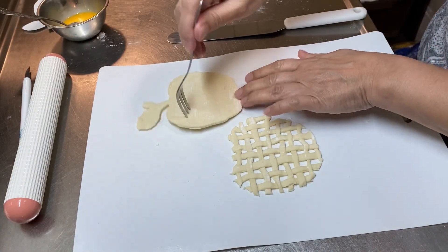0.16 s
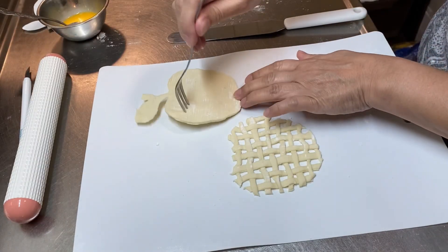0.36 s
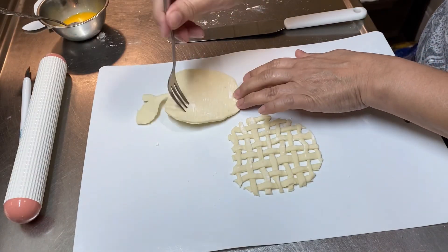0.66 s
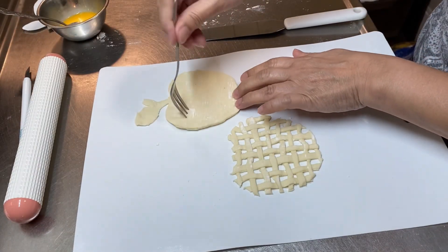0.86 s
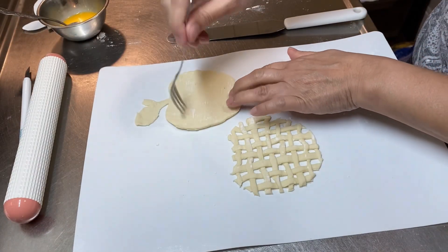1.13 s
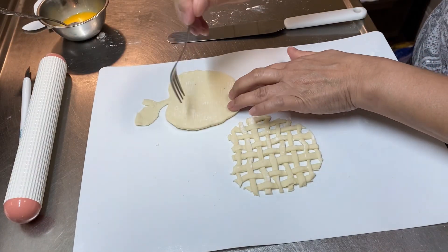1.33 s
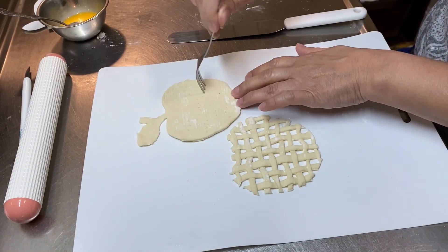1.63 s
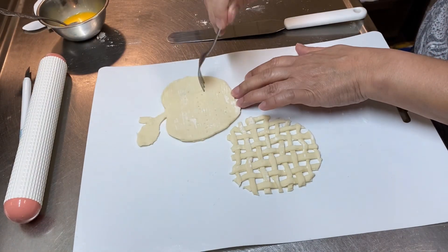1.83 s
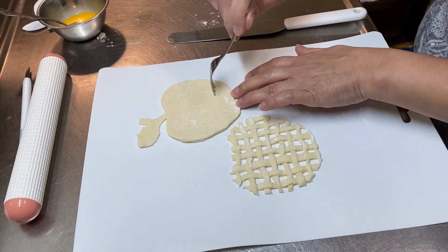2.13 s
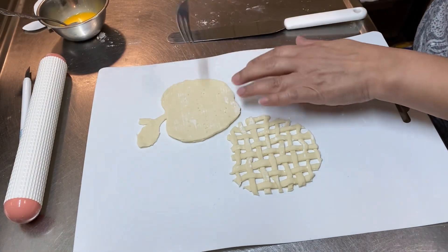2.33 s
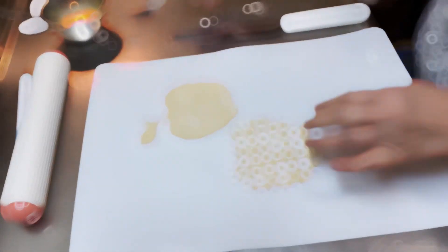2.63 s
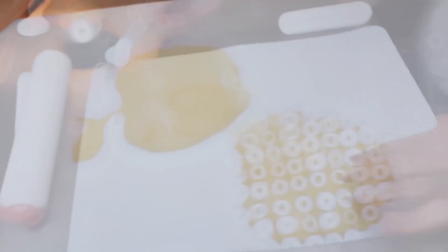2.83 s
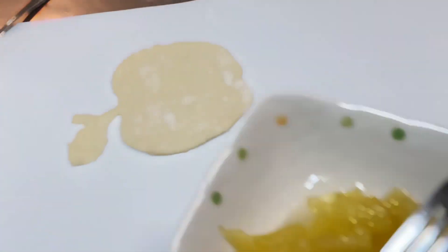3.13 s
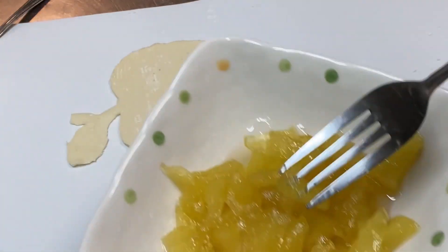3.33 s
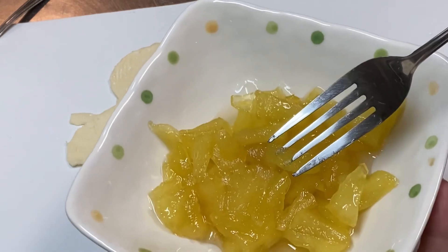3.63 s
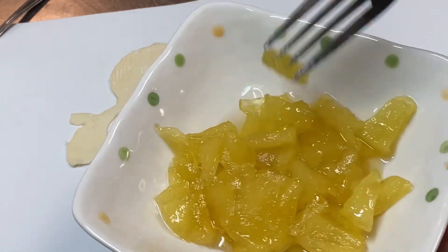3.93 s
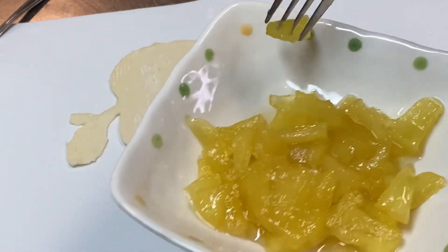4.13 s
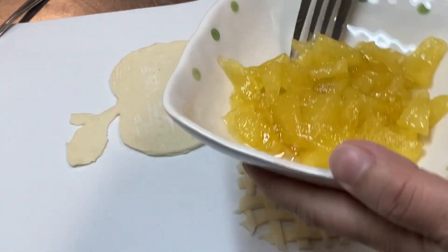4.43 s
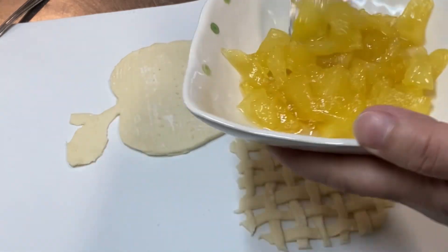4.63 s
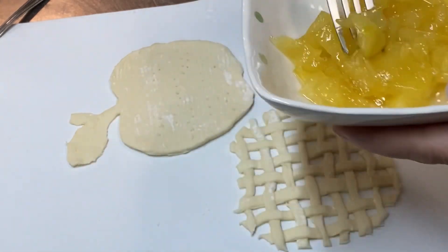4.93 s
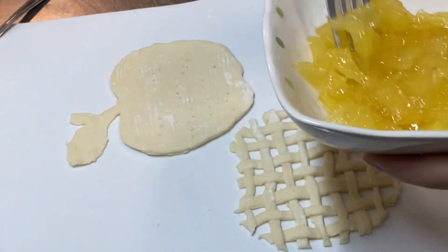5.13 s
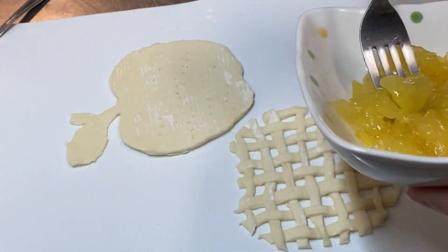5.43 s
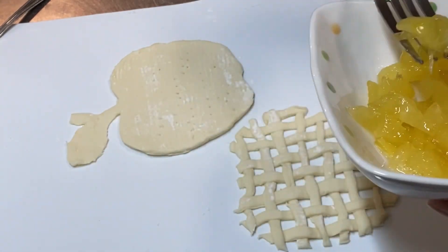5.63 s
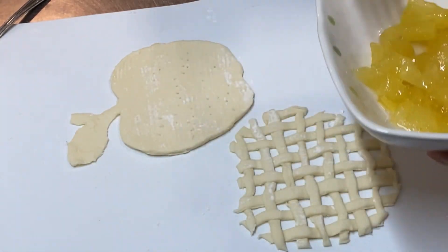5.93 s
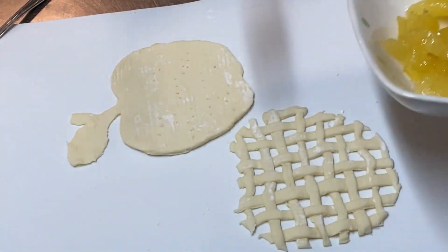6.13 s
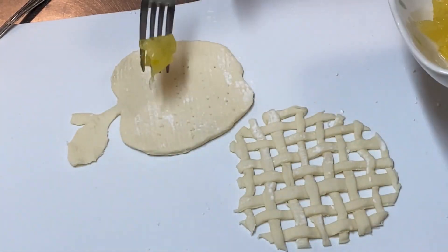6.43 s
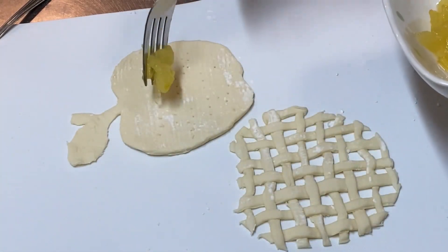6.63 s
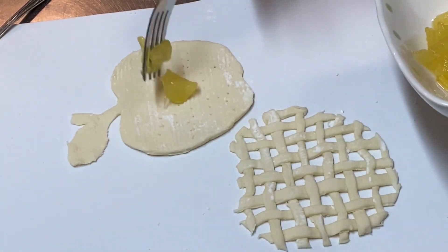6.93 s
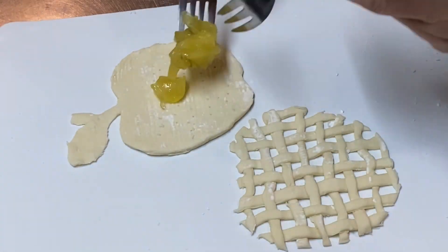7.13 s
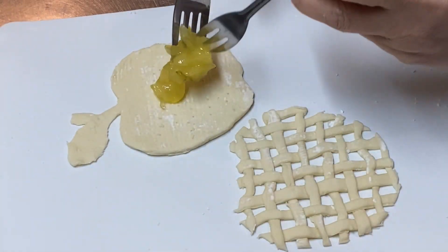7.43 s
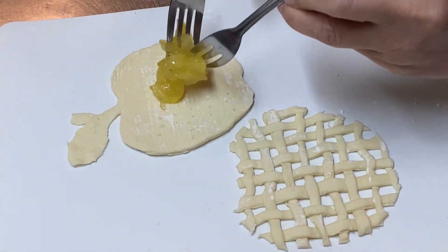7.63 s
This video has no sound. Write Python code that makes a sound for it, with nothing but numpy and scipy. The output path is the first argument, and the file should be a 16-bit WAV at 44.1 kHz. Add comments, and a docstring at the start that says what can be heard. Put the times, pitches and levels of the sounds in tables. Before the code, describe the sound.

Over steady appliance hum, a few short woody ticks from a fork on pastry, gentle skin rubs and dull counter thumps. Near three seconds, a small steel clink leads to a sharp, dense cutlery clatter, by far the loudest event, suddenly chopped to near silence. Then come a delicate ceramic clink, quiet rustles, a cluster of low bumps and moist dabs. Two tiny dropouts; thin hiss at the end. Close, dry, small kitchen.

```python
"""Fork and cutlery in a quiet kitchen

Shaped noise and a wavering 100 Hz hum form the background. Fork tines prick dough on a board in
short ticks; hands rub, touch and bump the counter in bursts of noise, and bumps also ring it.
The fork rings steel, cutlery crashes down and is cut short, then the fork rings a ceramic bowl.
The sound twice stops dead and fades back in; after the second time a hiss joins in."""
import sys
import numpy as np
from scipy import signal
from scipy.fft import rfft, irfft
from scipy.io import wavfile
from scipy.ndimage import uniform_filter1d

SR = 44100
rng = np.random.default_rng(int(sys.argv[2]) if len(sys.argv) > 2 else 0)


def inscribe(sig):
    """Save sig as 16-bit PCM at rate SR to the path in sys.argv[1].

    A 1-D sig is mono; a 2-D sig holds one channel per row.
    Samples are clipped to [-1, 1] before scaling.
    """
    pcm = np.round(np.clip(np.atleast_2d(sig).T, -1, 1) * 32767)
    wavfile.write(sys.argv[1], SR, pcm.astype(np.int16))


N = 342434  # length in samples

# In all tables t60 is the time to die away by 60 dB, and tilt favours the treble when positive.
# How alike left and right are for sounds on the counter: f/Hz, likeness (1 = the same)
NEAR_LIKENESS = [(100, .98), (400, .75), (900, .3), (2500, .45), (5000, .8), (8000, .9993)]
# Tone colour of rubbing, scraping and dry cracks: f/Hz, level/dB per Hz
RUB_COLOUR = [(600, -33.5), (1500, -10), (3000, -4), (4500, -9), (7000, -11.5), (9000, -7.5), (11000, -15),
              (13000, -14.5), (15500, -25)]
# Moments when the sound stops dead and then fades in again: t/s
DROPOUTS = [1.4546, 7.1323]


def amp(db):
    """Turn decibels into a plain factor."""
    return 10 ** (np.asarray(db) / 20)


def evened(x):
    """Scale a signal to an rms of 1."""
    return x / np.sqrt(np.mean(x ** 2) + 1e-20)


def read(points, hz):
    """Read a curve between its points, along a logarithmic pitch scale."""
    f, value = np.transpose(points)
    return np.interp(np.log(hz + 1), np.log(f + 1), value)


def add(mix, s, sound):
    """Add a sound to the mix from s seconds on, cutting what runs past the end."""
    part = mix[:, round(s * SR):][:, :sound.shape[1]]
    part += sound[:, :part.shape[1]]


def pair(size, likeness):
    """Two noise spectra that are partly alike, as at two nearby ears."""
    a, b, c, d = rng.standard_normal((4, size))
    same = np.clip(read(likeness, np.linspace(0, SR / 2, size)), -1, 1)
    left = a + 1j * b
    right = same * left + np.sqrt(1 - same ** 2) * (c + 1j * d)
    return np.array([left, right])


def noise(size, colour, tilt_db=0, peak_hz=0, bands_db=0):
    """Two-channel noise of a given colour, with an optional peak and chance narrow bands, rms 1."""
    hz = np.fft.rfftfreq(size, 1 / SR)
    peak_db = 9 / (1 + ((hz - peak_hz) / (.1 * peak_hz + 1)) ** 2)
    peak_db += bands_db * np.interp(hz, np.linspace(0, SR / 2, 100), rng.standard_normal(100))
    tilt = tilt_db * np.log2((hz + 50) / 1000)
    gain = amp(read(colour, hz) + tilt + peak_db)
    return evened(irfft(pair(len(hz), NEAR_LIKENESS) * gain, size))


def burst(colour, db, tilt_db, t60, rise=.002, peak_hz=0):
    """Noise that rises quickly, as at a contact, and dies away."""
    t = np.arange(16384) / SR
    envelope = amp(db - 6.5 - 60 * t / t60) * (1 - np.exp(-t / rise))
    return noise(len(t), colour, tilt_db, peak_hz) * envelope


def ring(modes, blur_hz, rise=.0005, clear=0.):
    """Dying tones of a struck body, partly clear and partly smeared as the contact chatters."""
    t, f = np.arange(16384) / SR, np.fft.rfftfreq(16384, 1 / SR)
    out = 0
    for hz, db, t60 in modes:
        # the right side leads or lags by chance, as far as the likeness allows
        lag = np.arccos(read(NEAR_LIKENESS, hz)) * np.array([[0], [rng.choice([-1, 1])]])
        tone = np.sqrt(2) * np.sin(2 * np.pi * (hz * t + rng.random()) + lag)
        narrow_band = 1 + (2 * (f - hz) / blur_hz) ** 2
        smear = evened(irfft(pair(len(f), NEAR_LIKENESS) / narrow_band))
        blend = np.sqrt(clear) * tone + np.sqrt(1 - clear) * smear
        out = out + amp(db - 60 * t / t60) * blend
    total = np.sqrt(sum(amp(2 * db) for hz, db, t60 in modes))
    return out * (1 - np.exp(-t / rise)) / total


def room(x, t60=0.25):
    """Dense reflections that die away, less alike left and right in the middle band."""
    t = np.arange(SR // 2) / SR
    taps = irfft(pair(len(t) // 2 + 1, NEAR_LIKENESS), len(t)) * amp(-60 * t / t60) * (t > .003)
    return signal.fftconvolve(x, taps / np.linalg.norm(taps[0]), axes=1)[:, :N]


def background_level(t):
    """A level in dB that drifts evenly within each stretch and may jump between stretches."""
    # Stretches of background: start t/s, level at start/dB, level at end/dB
    stretches = [(0.0, -60.5, -61), (1.4548, -60.5, -55), (3.2674, -60, -60), (7.1324, -57.5, -59.5)]
    start, first_db, last_db = np.transpose(stretches)
    k = np.clip(np.searchsorted(start, t, "right") - 1, 0, None)
    share = (t - start[k]) / np.diff(np.append(start, N / SR))[k]
    return first_db[k] + share * (last_db - first_db)[k]


def room_tone():
    """Appliance noise with broad resonances, and a mains hum blurred by a narrow band of noise."""
    # Colour of the noise: f/Hz, level/dB per Hz
    tone_colour = [(24, -40), (40, -14.5), (69, -17.5), (83, -7.5), (104, -4.5), (130, -20.5), (231, -35),
                   (305, -30), (990, -39.5), (1630, -46.5), (2210, -47), (3220, -61), (5500, -70.5),
                   (16000, -82)]
    # Left-right likeness of far noise: f/Hz, likeness
    far_likeness = [(60, 0.96), (150, 0.81), (500, 0.069), (1600, 0.054), (5000, 1), (8000, 0.59)]
    # Left-right balance: f/Hz, left minus right/dB
    balance = [(40, -0.5), (100, 5), (250, -2), (4000, 1.5)]
    # Appliance resonances: f/Hz, width/Hz, boost/dB
    drones = [(51, 21, 4.5), (499, 40, 6.5), (990, 12, 7.5), (1250, 250, 4.5), (4259, 170, 8.5)]
    # The wavering hum, before its left-right balance: t/s, level/dB
    hum_levels = [(0.0, -43.5), (0.26, -52), (0.5, -45.5), (0.62, -52), (0.95, -42), (1.07, -54),
                  (1.25, -44.5), (1.45, -46.5), (1.75, -45.5), (2.46, -40), (3.24, -40.5), (3.35, -43.5),
                  (3.93, -45.5), (4.2, -43.5), (5.7, -45), (6.3, -44), (6.65, -46.5), (7.26, -42),
                  (7.76, -45.5)]
    hum_hz, hum_width_hz, hum_blur = 100, 24, .45
    t, hz = np.arange(N) / SR, np.fft.rfftfreq(N, 1 / SR)
    lean_db = np.outer([.5, -.5], read(balance, hz))
    drone_db = sum(db / (1 + (2 * (hz - f) / width) ** 2) for f, width, db in drones)
    z = pair(len(hz), far_likeness) * amp(read(tone_colour, hz) + lean_db + drone_db)
    z *= 1 - 1.0 / (1 + ((hz - hum_hz) / 16) ** 4)  # the hum fills this band by itself
    middle = irfft(z * (hz > 200) * (hz < 2500), N)
    wide = irfft(z, N) / middle.std()  # level is set in the middle band

    narrow_band = 1 + (2 * (hz - hum_hz) / hum_width_hz) ** 2
    blur = evened(irfft(pair(len(hz), far_likeness) / narrow_band, N))
    # the steady hum is timed from the dropouts, and shifts its timing at the first
    crest = np.where(t < DROPOUTS[0], *DROPOUTS) + .0016
    steady = np.sqrt(2) * np.cos(2 * np.pi * hum_hz * (t - crest))
    hum = evened(steady + hum_blur * blur) * amp([[1.2], [-1.2]])
    return wide * amp(background_level(t)) + hum * amp(np.interp(t, *np.transpose(hum_levels)))


def rubs():
    """Rubbing hands and sleeve: noise that swells and fades under an uneven grip."""
    # Rubs: middle t/s, length/s, level/dB, tilt/dB per octave, loudest f/Hz
    strokes = [(0.144, 0.2, -62, -2.5, 1990), (0.265, 0.15, -71.5, -3, 6950), (0.461, 0.11, -71, 0, 4350),
               (0.834, 0.078, -76, 8, 6440), (2.197, 1, -72.5, -3, 4140), (2.416, 0.18, -60, -17, 6400),
               (2.579, 0.31, -70, -2.5, 3380), (2.795, 0.43, -74, -4.5, 4300),
               (2.979, 0.21, -67.5, 0, 6500), (4.152, 0.68, -76.5, 0.5, 4530), (4.486, 0.31, -62, 1, 4200),
               (4.483, .11, -61, -5, 3100), (4.974, 0.31, -75, 0, 4494), (5.276, 0.79, -73, -4, 4830),
               (6.301, .13, -70.5, -7, 3180), (6.371, 0.2, -74.5, 1.5, 5800)]
    out = np.zeros((2, N))
    for s, length, db, tilt_db, peak_hz in strokes:
        swell = np.hanning(round(length * SR)) ** 1.5
        grip = amp(1.3 * evened(uniform_filter1d(rng.standard_normal(len(swell)), 300)))
        rubbing = noise(len(swell), RUB_COLOUR, tilt_db, peak_hz, bands_db=1)
        add(out, s - len(swell) / SR / 2, amp(db) * swell * grip * rubbing)
    return out


def pricks():
    """A few quick cycles of the board while the tines touch it, and a dry crack."""
    # Pricks: t/s, peak level/dB, ring f/Hz, left minus right/dB, contact/s, crack against the peak/dB
    jabs = [(0.406, -34, 1930, 1.5, 0.00079, -37), (0.457, -50.5, 1880, 0, 0.004, -20),
            (0.6631, -36, 1840, 1, .0009, -33), (1.617, -46, 2020, 0, 0.0014, -3.5),
            (1.9324, -21, 1803, 1.5, 0.00139, -12), (2.937, -27, 2600, -1, 0.00048, -1)]
    # Other tones of the board: ratio to the ring, level/dB
    overtones = [(1.475, -13), (1.855, -21), (0.54, -11.5)]
    out, t = np.zeros((2, N)), np.arange(1024) / SR
    for s, db, hz, pan_db, contact, crack_db in jabs:
        tick = np.sin(2 * np.pi * hz * t)
        tick += sum(amp(g) * np.sin(2 * np.pi * k * hz * t) for k, g in overtones)
        tick = tick * np.exp(-(t / contact - 1.3) ** 2)
        sides = amp(db + np.array([[.5], [-.5]]) * pan_db)
        add(out, s - .001, sides * tick / np.abs(tick).max())
        add(out, s - .0005, burst(RUB_COLOUR, db + crack_db, -2.8, 0.013, rise=0.000096))
    return out


def bumps():
    """Hands bump the counter: a burst of noise, a low boom and the ringing of the counter."""
    # Bumps: t/s, nominal level/dB, tilt/dB per octave, boom f/Hz, boom against that level/dB
    hits = [(1.616, -33, -2, 64.3, -4.5), (1.935, -33, 5, 60, -5), (2.096, -29.5, -2, 64, -5.5),
            (5.064, -43, 2, 161, -15), (5.669, -32, 2.5, 160, -14), (5.683, -30, 1.5, 152.6, -18),
            (5.697, -35, 0.5, 150, 3), (5.98, -55, 6, 154.1, 1.5), (6.599, -40.5, -1, 158, -21),
            (6.746, -47.5, 4, 164.5, -12)]
    # Colour of the noise: f/Hz, level/dB per Hz
    colour = [(40, -20), (160, -9), (570, -13), (1150, -24), (2500, -35), (3850, -46), (8000, -72),
              (12000, -84)]
    # Tones of the counter, for an untilted bump: f/Hz, level/dB, t60/s
    counter = [(154.1, 0.5, 0.41), (275, -15, .25), (343, -9, 0.13), (437, -8, 0.38), (569.4, -6.5, 0.32),
               (793, -9.5, 0.089), (897, -7.5, 0.21), (1410, -10, 0.11), (1975, -17, 0.21)]
    base_t60, shorter_per_db = 0.27, 0.03  # s; brighter bumps die sooner
    out = np.zeros((2, N))
    for s, db, tilt_db, boom_hz, boom_db in hits:
        t60 = base_t60 * np.exp(-shorter_per_db * tilt_db)
        boom = ring([(boom_hz, 0, 1.07 * t60)], blur_hz=29.7, rise=0.0018, clear=0.67)
        modes = [(hz, g + tilt_db * np.log2(hz / 400), decay * t60 / base_t60) for hz, g, decay in counter]
        knock = ring(modes, blur_hz=39.4, rise=0.0079, clear=0.96)
        thud = burst(colour, db - 4, tilt_db, t60, rise=0.0027)
        add(out, s, thud + amp(db + boom_db) * boom + amp(db - 9.5) * knock)
    return out


def scuffs():
    """Soft wet touches: small bursts of rubbing noise."""
    # Touches: t/s, nominal level/dB, tilt/dB per octave, t60/s
    wet_touches = [(2.098, -53, -5, 0.079), (2.53, -58, -4, 0.38), (3.748, -57.5, -5.5, 0.22),
                   (3.87, -61, -2.5, 0.19), (5.069, -61, -1.5, 0.12), (6.743, -53.5, 0.5, 0.19)]
    out = np.zeros((2, N))
    for s, db, tilt_db, t60 in wet_touches:
        add(out, s, burst(RUB_COLOUR, db, tilt_db, t60, rise=0.00062))
    return out


def fork_clinks(hits, modes, scrape_t60):
    """Each hit of the fork sets an object ringing and adds a short scrape of noise."""
    out = np.zeros((2, N))
    for s, db in hits:
        ringing = amp(db - 9.0) * ring(modes, blur_hz=250, clear=0.23)
        scrape = burst(RUB_COLOUR, db - 10.5, 0.5, scrape_t60, rise=0.00033)
        add(out, s, ringing + scrape)
    return out


def steel_clinks():
    """The fork rings steel, whose tones die within about a tenth of a second."""
    # Hits: t/s, nominal level/dB
    hits = [(2.6328, -30), (2.6432, -39)]
    # Tones of the steel: f/Hz, level/dB, t60/s
    modes = [(2780, 0, 0.1), (2920, 6, 0.068), (3550, -5, 0.089), (3850, -3, 0.097), (4550, -2.5, 0.068),
             (5900, -6, 0.084), (6300, 7.5, 0.04), (8800, 0, 0.062), (11860, -6, 0.048)]
    return fork_clinks(hits, modes, scrape_t60=.053)


def clatter():
    """Cutlery lands: a sharp crack, a dense rattle on the counter and the ringing of the metal."""
    # Landings: t/s, nominal level/dB, tilt/dB per octave, t60/s, ring against that level/dB,
    # ring blur/Hz, crack against that level/dB
    landings = [(3.031, -27.5, -2.5, 0.24, -15.5, 90, -6.5), (3.152, -12.5, -3, 0.4, -8.5, 149.6, -11.5),
                (3.2, -8.5, 0.5, 0.28, -3.5, 70, 3.5)]
    # Short second contacts: t/s, nominal level/dB
    rebounds = [(3.173, -16), (3.2143, -10), (3.228, -12)]
    # Colour of the crash: f/Hz, level/dB per Hz
    colour = [(40, -35.5), (90, -15.5), (244, -9.5), (417, -12.5), (566, -3.5), (690, -9), (1510, -7),
              (2410, -11.5), (6280, -15), (8300, -12.5), (9200, -9.5), (11000, -19.5), (13000, -18),
              (16000, -20.5)]
    # Tones of the cutlery: f/Hz, level/dB
    cutlery = [(240, -9.5), (300, -11), (530, -1), (570, 0.5), (760, -1.5), (943, -4), (1017, -5),
               (1230, -4), (1472, -1.5), (2695, -7.5), (3252, -11), (3464, -9.5), (3648, -9.5), (4275, -10),
               (6184, -2), (7640, -15.5), (10038, 0.5), (11658, -13), (12600, -7)]
    out = np.zeros((2, N))
    for s, db, tilt_db, t60, ring_db, blur_hz, crack_db in landings:
        modes = [(hz, g, 2.2 * t60 * (hz / 1000) ** -.15) for hz, g in cutlery]  # high tones die sooner
        rattle = burst(colour, db, tilt_db, t60, rise=0.00022)
        rattle += burst(colour, db + crack_db, tilt_db + 3.5, .08, rise=.0002, peak_hz=6217)
        # small rebounds make the level flutter
        rattle *= amp(1.2 * evened(uniform_filter1d(rng.standard_normal(rattle.shape[1]), 130)))
        add(out, s, rattle + amp(db + ring_db - 7) * ring(modes, blur_hz, clear=.7))
    for s, db in rebounds:
        add(out, s, burst(colour, db, -1.3, .03, rise=.0004))
    return out


def bowl_clinks():
    """The fork rings the ceramic bowl, mostly longer than the steel."""
    # Hits: t/s, nominal level/dB
    hits = [(3.9905, -46), (4.0067, -43.5)]
    # Tones of the bowl: f/Hz, level/dB, t60/s
    modes = [(2298, -1, 0.14), (3030, -3, 0.1), (4420, -9, 0.27), (5400, 2.5, 0.27), (5575, 5, 0.21),
             (12100, -10, 0.1)]
    return fork_clinks(hits, modes, scrape_t60=.2)


def late_hiss():
    """Steady noise that sets in within a moment of the second dropout and stays."""
    # Colour of the hiss: f/Hz, level/dB per Hz
    colour = [(700, -30), (1050, 1), (1500, 2.5), (1750, -8), (4500, -18), (6000, -50), (16000, -46)]
    hiss_db, rise_s = -66.5, 0.019
    out, t = np.zeros((2, N)), np.arange(N - round(DROPOUTS[1] * SR)) / SR
    hiss = noise(len(t) + 1, colour)[:, :len(t)]
    add(out, DROPOUTS[1], amp(hiss_db) * hiss * (1 - np.exp(-t / rise_s)))
    return out


def scene():
    """Mix all sources; pricks and clinks also sound in the room."""
    cut_s, cut_db = 3.2672, -22
    background, rubbing, tick = room_tone(), rubs(), pricks()
    touches = rubbing + bumps() + scuffs()
    clink = steel_clinks()
    before = tick + amp(-5.0) * room(tick, 0.13) + clatter()
    clink = clink + bowl_clinks()
    # the clatter is cut off; a faint remnant holds for 9 ms, then fades at 2500 dB per second
    after = np.arange(N) / SR - cut_s
    kept = np.where(after < 0, 1, amp(cut_db - 2500 * np.maximum(after - .009, 0)))
    return before * kept + clink + amp(-7.5) * room(clink) + touches + background + late_hiss()


def record(dry):
    """Two microphone ports out of step in the treble; a bass cut, dropouts and a treble limit."""
    # Lag of the right port: f/Hz, lag/half turns
    port_lags = [(6400, 0), (8300, 1), (9700, 1), (11200, 2), (13600, 2), (14600, 3)]
    silent_s, fade_in_s, edge_hz = 0.0026, 0.018, 16300
    lag = np.exp(-1j * np.pi * read(port_lags, np.fft.rfftfreq(N, 1 / SR)))
    ports = np.array([dry[0], irfft(rfft(dry[1]) * lag, N)])
    ports = signal.sosfilt(signal.butter(4, 38, "high", fs=SR, output="sos"), ports)
    ports = ports * np.minimum(np.arange(N) / (.003 * SR), 1)  # soft start
    for s in DROPOUTS:
        since = np.arange(N) / SR - s
        ports = ports * np.where(since < 0, 1, np.clip((since - silent_s) / fade_in_s, 0, 1))
    band_limit = signal.firwin(511, edge_hz, window=("kaiser", 9), fs=SR)
    return signal.oaconvolve(ports, band_limit[None], "same")


dry = scene()
out = record(dry)
inscribe(out)
```